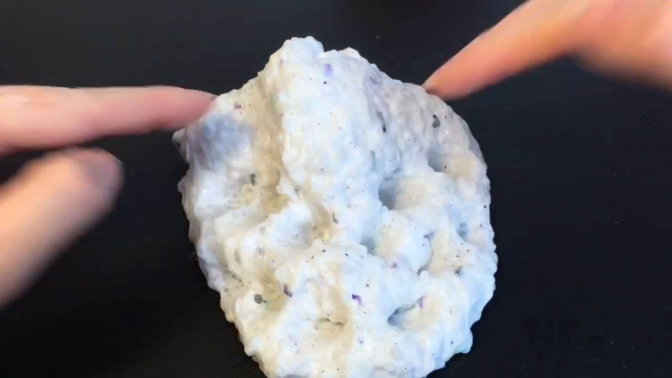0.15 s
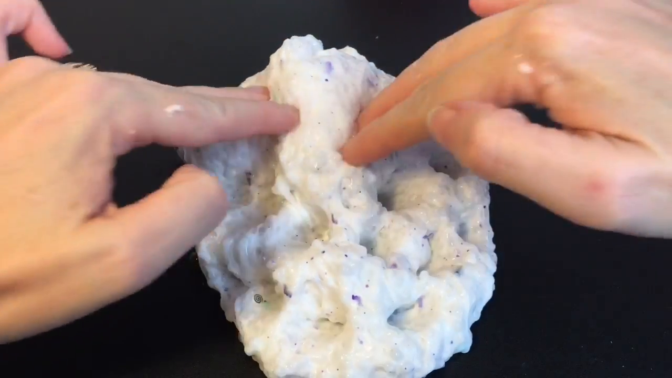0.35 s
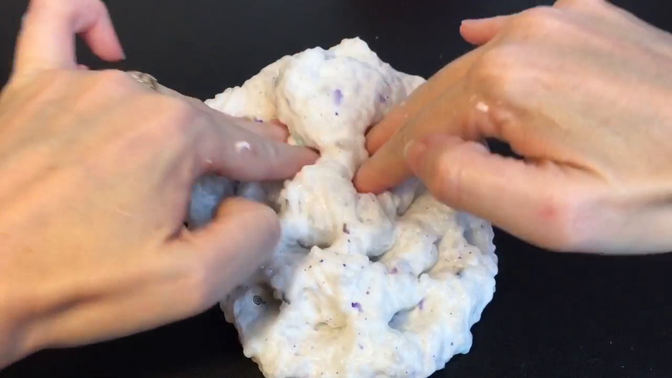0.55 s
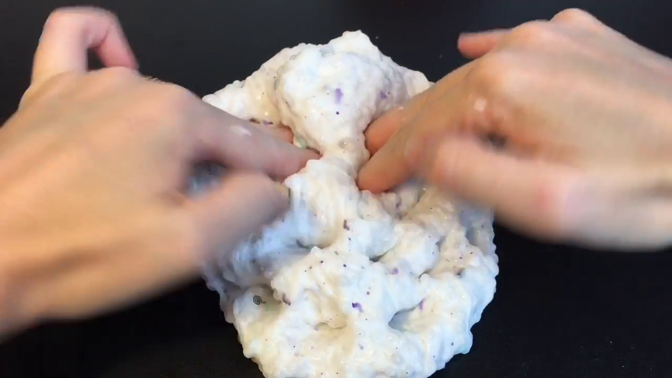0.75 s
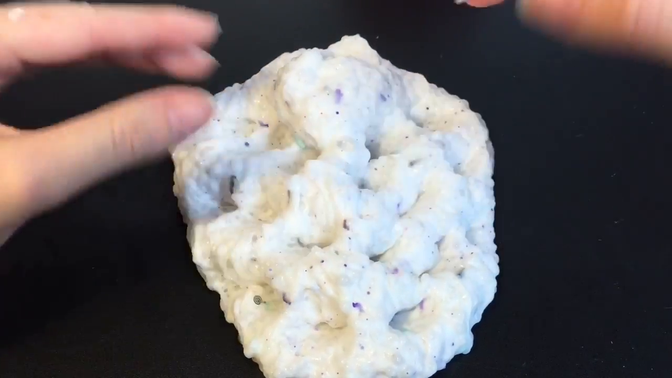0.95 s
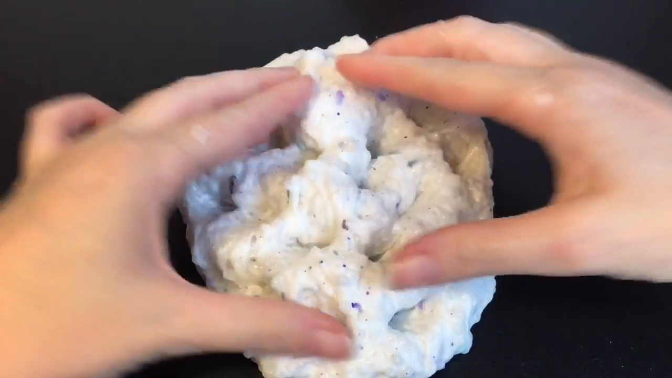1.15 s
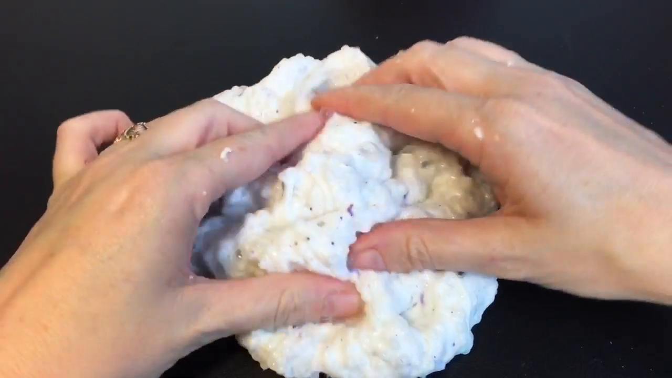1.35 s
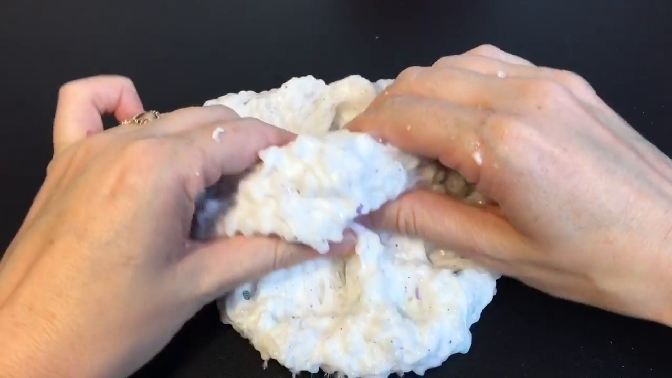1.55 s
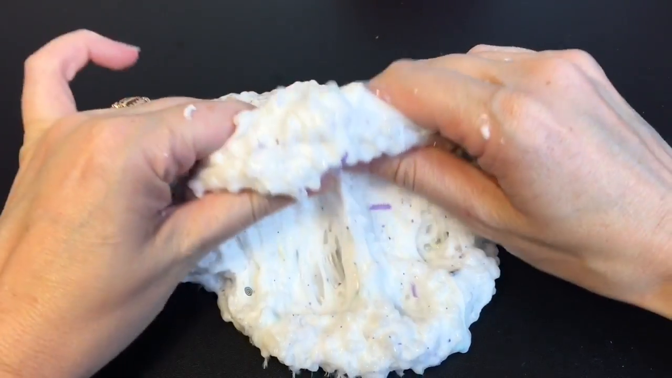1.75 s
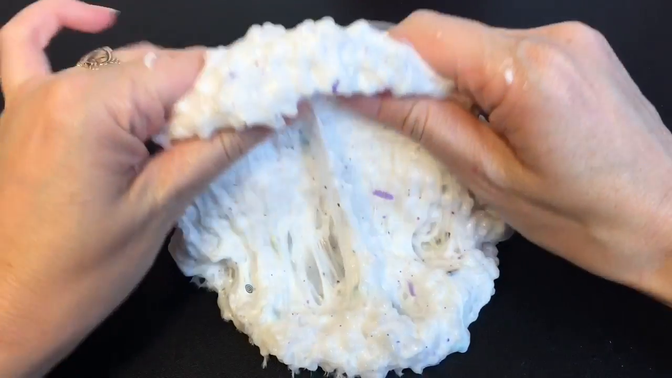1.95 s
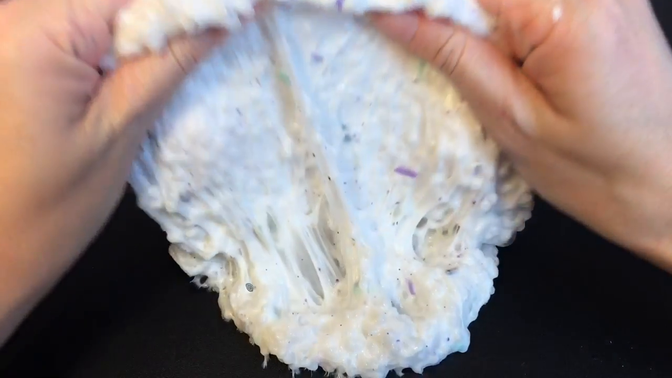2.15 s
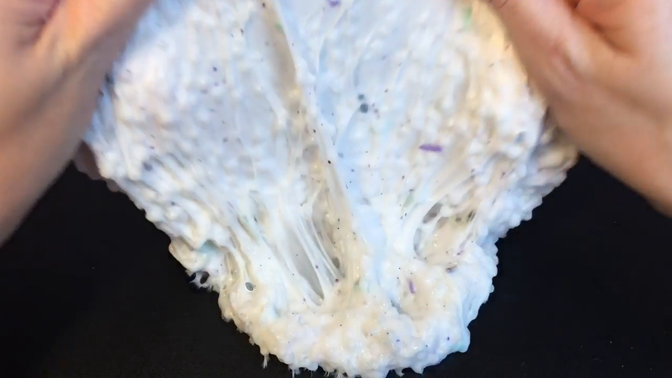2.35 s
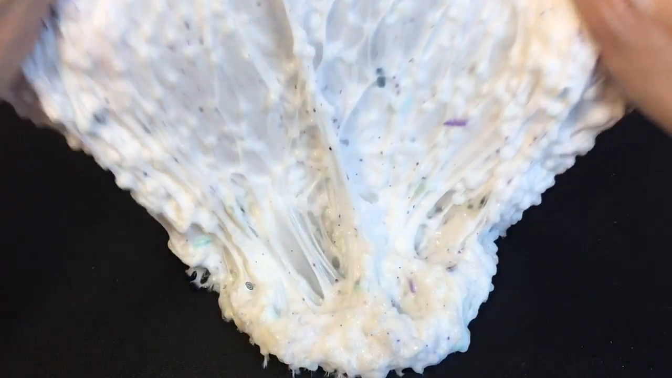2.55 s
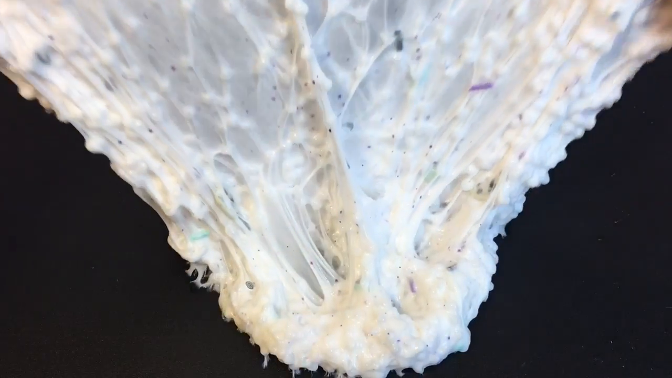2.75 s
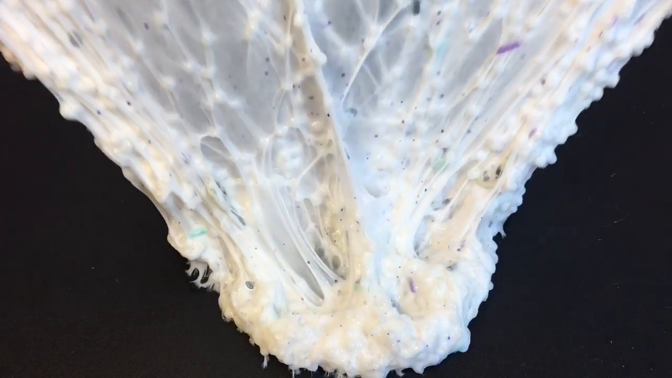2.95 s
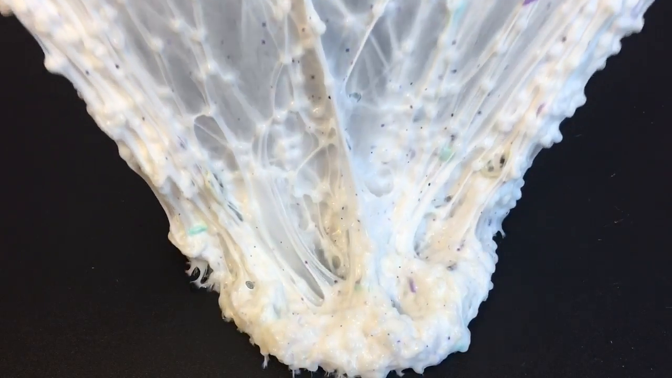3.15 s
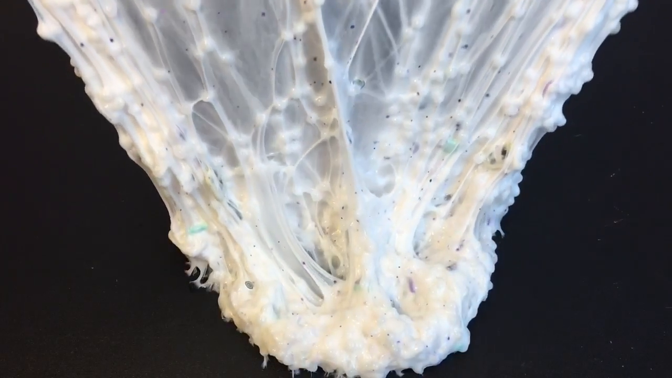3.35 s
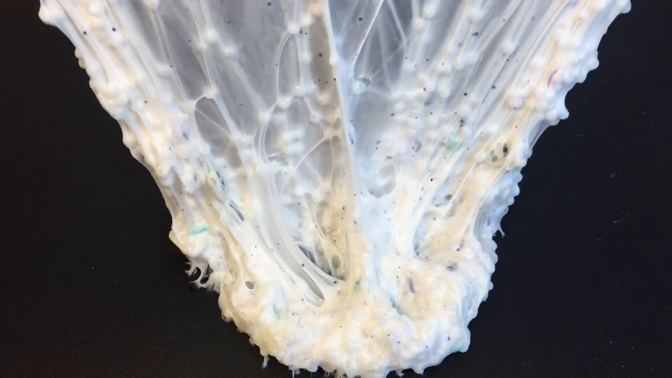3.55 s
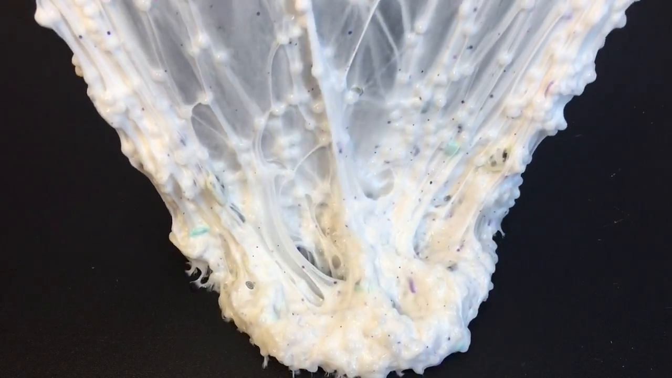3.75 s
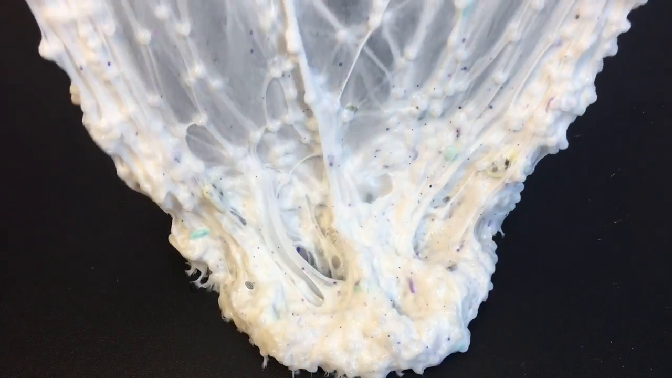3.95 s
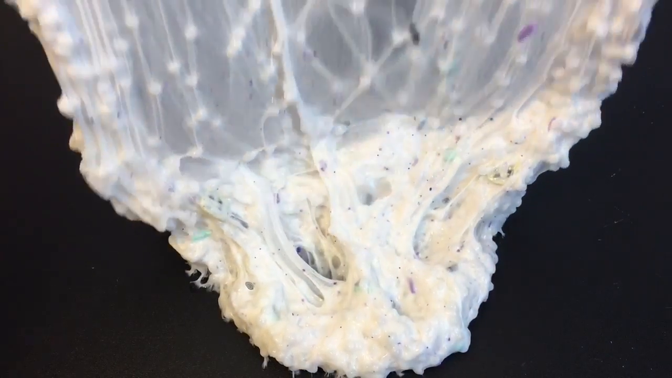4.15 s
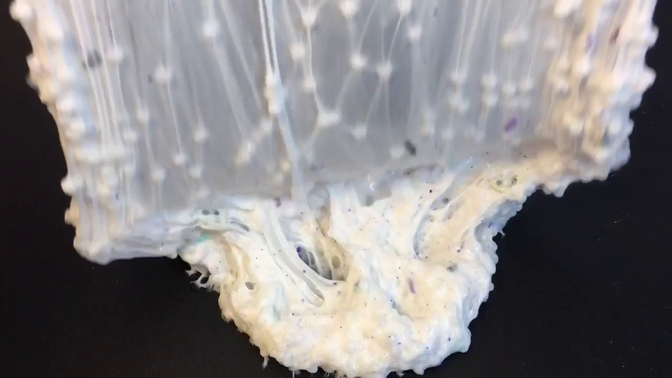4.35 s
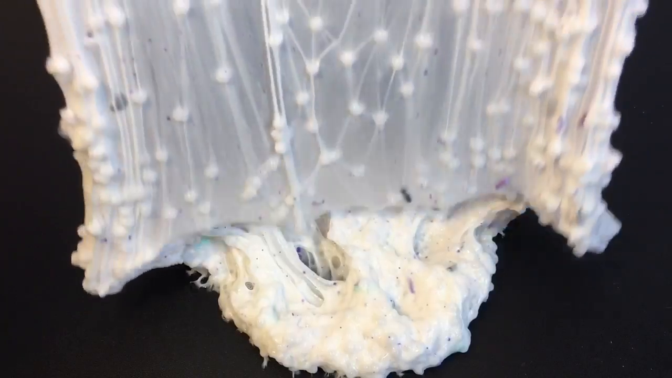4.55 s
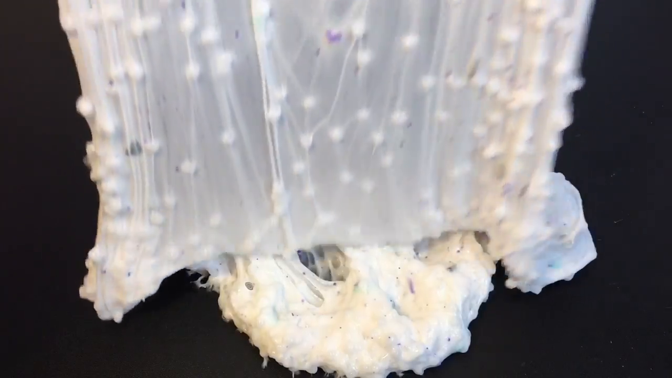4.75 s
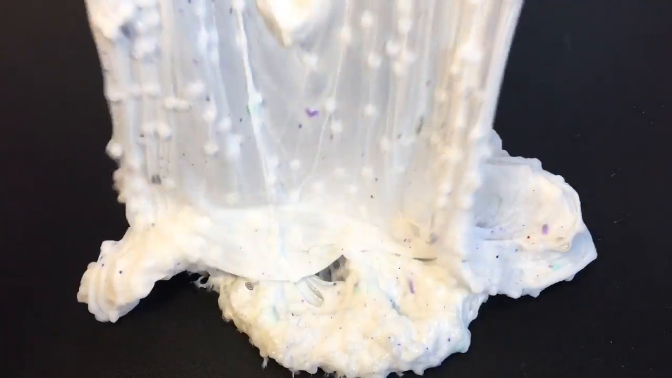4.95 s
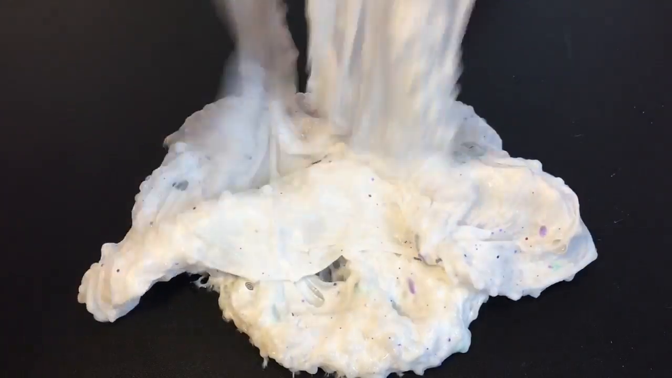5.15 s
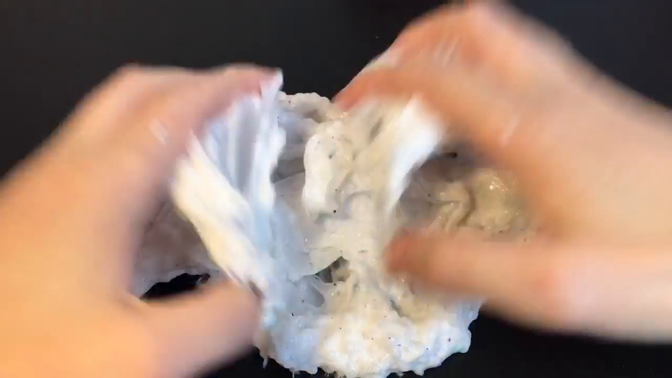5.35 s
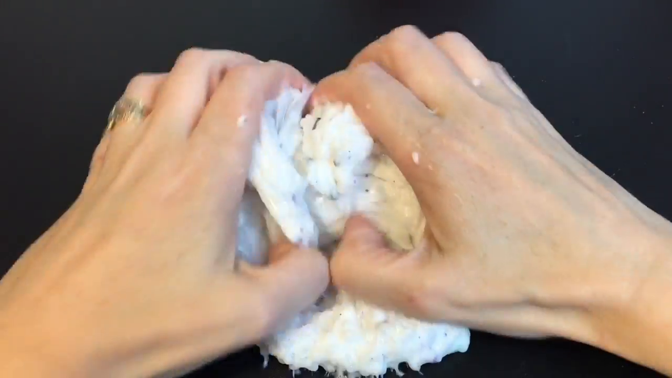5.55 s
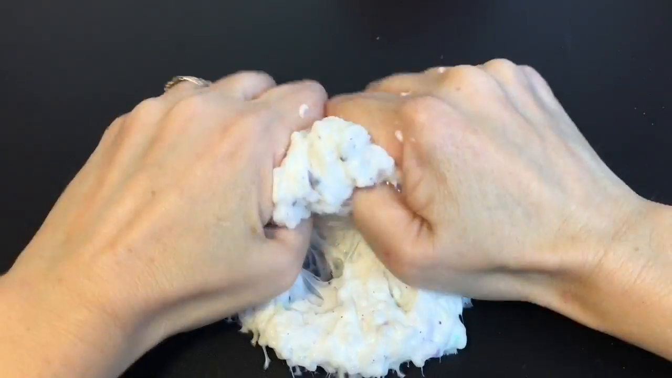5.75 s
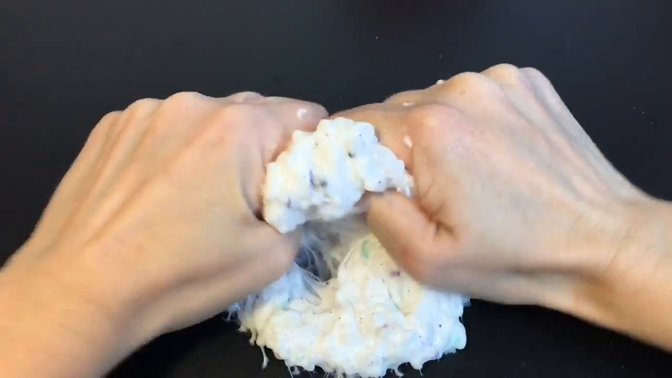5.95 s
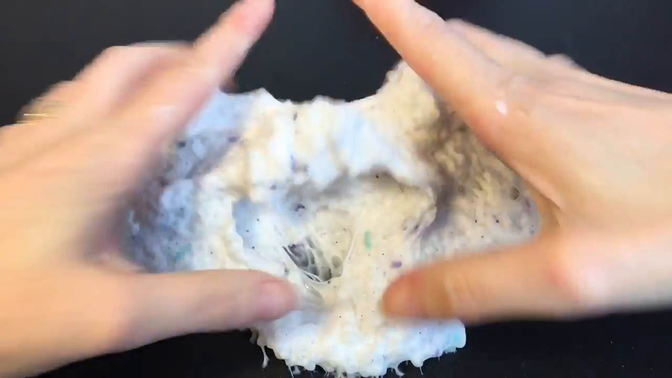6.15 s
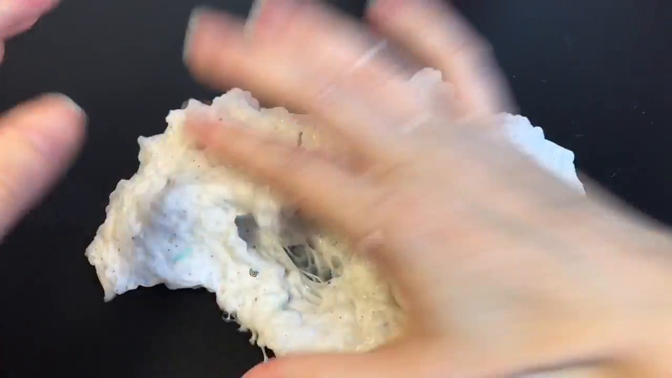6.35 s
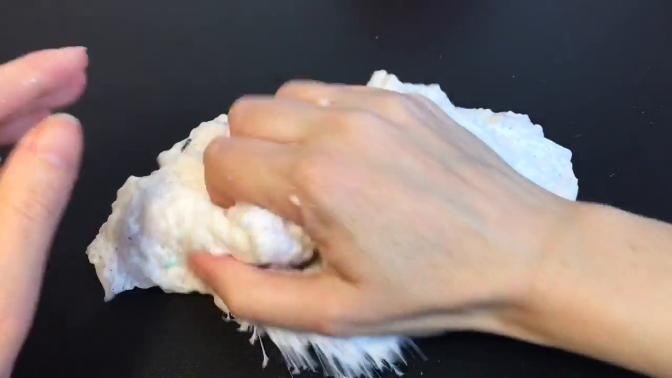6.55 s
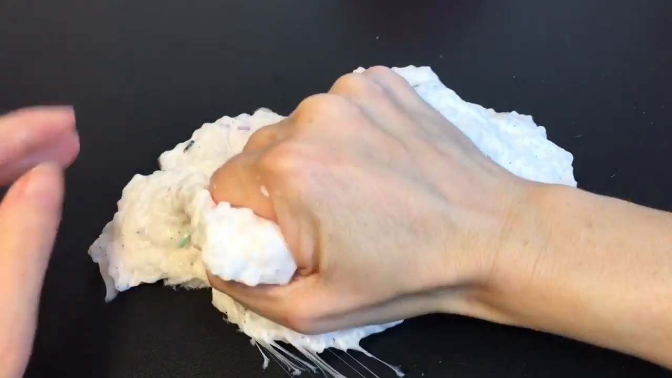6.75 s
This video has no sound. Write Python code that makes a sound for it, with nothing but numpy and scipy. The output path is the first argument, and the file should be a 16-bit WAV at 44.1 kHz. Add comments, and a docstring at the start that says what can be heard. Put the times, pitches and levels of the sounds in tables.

```python
"""Two hands knead a foam-bead slime on a table, close to the microphone in a small room.
First fingers poke it: trapped air pockets pop over a crackle of tiny bubbles, and the table thumps softly.
Then they grip, lift and stretch it; the thin sheet is almost silent until it folds back onto the table.
Squeezing it gives the loudest crunch; then it is pressed down, let go and squeezed once more by one hand.
Pops and crackle are short clicks ringing in damped air cavities; thumps are fading sine waves.
Shaped noise makes a dull rubbing and the air of the room, with a faint hum and a gliding drone behind."""
import sys
import numpy as np
from scipy import signal
from scipy.fft import rfft, irfft
from scipy.io import wavfile
from scipy.ndimage import uniform_filter1d

SR = 44100
rng = np.random.default_rng(int(sys.argv[2]) if len(sys.argv) > 2 else 0)


def bounce(signal):
    """Save signal as a 16-bit WAV file at the path given by the first command-line argument."""
    frames = np.transpose(np.atleast_2d(signal))
    limited = np.clip(frames, -1, 1)
    pcm = np.round(limited * 32767).astype(np.int16)
    wavfile.write(sys.argv[1], SR, pcm)


N = 303849


def from_db(db):
    """Turn decibels into a gain."""
    return 10 ** (np.asarray(db) / 20)


def rms_one(x):
    """Scale a sound to an average (rms) level of 1."""
    return x / np.sqrt(np.mean(x ** 2) + 1e-20)


def unit_energy(x):
    """Scale a pulse to an energy of 1."""
    return x / np.sqrt(np.sum(x ** 2) + 1e-20)


def at_hz(points, hz):
    """Read a spectrum in dB between its points, on a logarithmic pitch axis."""
    f, db = np.transpose(points)
    return np.interp(np.log(np.maximum(hz, 1)), np.log(f), db)


def coloured(x, spectrum):
    """Make some pitches of a noise stronger than others."""
    gain = from_db(at_hz(spectrum, np.fft.rfftfreq(len(x), 1 / SR)))
    return irfft(rfft(x) * gain, len(x))


def in_time(rows):
    """Join the rows of a curve by straight lines."""
    s, *columns = np.transpose(rows)
    return [np.interp(np.arange(N) / SR, s, column) for column in columns]


def drift(rate):
    """Wander at random with spread 1, heading for a new value `rate` times a second."""
    knots = rng.standard_normal(N // 20)
    return rms_one(np.interp(np.arange(N) / SR * rate, np.arange(len(knots)), knots))


def cavity(x, hz, q):
    """Ring like an air cavity: one resonance with gain 1 on top; a low q dies within a few cycles."""
    w = 2 * np.pi * min(hz, SR * 4 / 9) / SR
    damp = np.sin(w) / (2 * q)
    top, bottom = [damp, 0, -damp], [1 + damp, -2 * np.cos(w), 1 - damp]
    return signal.lfilter(top, bottom, x + 1e-18)


# Presses and pulls of the hands: poking, gripping and lifting, pulling up, the sheet thinning and tearing,
# folding onto the table, both hands squeezing, pressing down and letting go, one hand squeezing.
# Each row: start in seconds, end in seconds, fizz of the tiny bubbles at the start in dB, fizz at the
# end in dB, squelch of the larger bubbles in dB above the fizz.
STROKES = [(0.059, 0.115, -34.5, -32, -4), (0.392, 0.736, -61.5, -50.5, -1.5),
           (0.887, 0.959, -33, -38, -4.5), (1.296, 1.317, -37.5, -42, -6), (1.349, 1.433, -53.5, -44, 0.5),
           (1.468, 1.768, -40, -49, -4), (1.927, 1.968, -47, -45, -3.5), (1.77, 2.404, -51.5, -55, -5),
           (2.225, 2.257, -42, -47.5, -5.5), (2.452, 3.323, -59.5, -80, -6),
           (2.651, 2.714, -56.5, -59, 1.5), (4.956, 5.108, -61, -46.5, -17),
           (5.13, 5.203, -31.5, -38, -8.5), (5.241, 5.312, -33.5, -41.5, -11),
           (5.462, 5.8, -54.5, -29.5, -4.5), (5.773, 5.967, -25, -34, -7),
           (6.092, 6.199, -28.5, -31.5, -2.5), (6.21, 6.315, -40, -39.5, -3),
           (6.467, 6.568, -49.5, -46.5, -0.5), (6.594, 6.714, -29, -32.5, -8),
           (6.765, 6.757, -33.5, -26, 2)]
ATTACK_DB_PER_S, RELEASE_DB_PER_S = 748, 643   # the crackle comes and goes with the pressure
CREEP_DB, CREEP_DB_PER_S = -17.5, 149   # around each stroke the slime creeps, faintly and for longer
REST_FIZZ_DB, REST_SQUELCH_DB = -81, -85   # slime hanging under its own weight


def kneading(first_db, last_db, rest_db):
    """Crackle level in dB: strokes set in, swell or ease, and let go; the strongest one leads."""
    t, level_db = np.arange(N) / SR, np.full(N, float(rest_db))
    for (start, end, *_), held_db in zip(STROKES, zip(first_db, last_db)):
        before, after = np.maximum(start - t, 0), np.maximum(t - end, 0)
        pressure_db = -ATTACK_DB_PER_S * before - RELEASE_DB_PER_S * after
        creep_db = CREEP_DB - CREEP_DB_PER_S * (before + after)
        stroke_db = np.interp(t, [start, end], held_db) + np.maximum(pressure_db, creep_db)
        level_db = np.maximum(level_db, stroke_db)
    return level_db


# Large air pockets bursting.
# Each row: start in seconds, relative energy in dB, pitch of the cavity in Hz,
# share of the energy in the snap of the film (0 to 1).
POPS = [(0.0629, -3.5, 750, 0.47), (0.0775, -1, 4400, 0), (0.0939, -5, 505, 0.6), (0.119, -3.5, 3080, 0),
        (0.3769, -23, 3180, .26), (0.4668, -17, 6940, .13), (0.5572, -22, 2580, 0), (0.571, -20, 6110, 0.1),
        (0.6193, -11, 6770, 0.34), (0.6923, -11.5, 3200, 0.02), (0.7067, -14, 870, 0.23),
        (0.7234, -15, 4340, 0.1), (0.8865, -1.5, 12700, .36), (0.8931, 0.5, 4160, 0.13),
        (0.951, -11, 590, 0), (0.961, -5.5, 3320, 0), (1.283, -4, 5600, 0.1), (1.2958, -0.5, 4600, 0.06),
        (1.3766, -8, 6200, 0), (1.3868, -8.5, 980, 0.43), (1.4204, -3.5, 7100, 0),
        (1.483, -2.5, 7300, 0.05), (1.5822, 4.5, 3800, 0.1), (1.6997, -5.5, 3300, 0),
        (1.736, -17, 3780, .06), (1.7613, -12, 3580, 0), (1.8005, -7.5, 2700, 0), (1.8099, -11, 2970, .98),
        (1.8814, -18.5, 6780, 0.3), (1.9229, -11.5, 1040, 0.98), (1.958, -15.5, 4500, .4),
        (2.2492, -9, 4860, 0.3), (2.3282, -4.5, 7240, 0.08), (2.4083, -25, 1900, 0),
        (2.5004, -15, 12600, 0.27), (2.5665, -26.5, 690, 0.65), (2.623, -23.5, 8570, 0.1),
        (2.648, -24, 2200, 0), (2.667, -22.5, 2700, 0), (2.7113, -19, 6300, 0), (3.135, -30.5, 3200, 0.2),
        (3.24, -25, 3650, .02), (3.2922, -21, 6860, 0), (4.1008, -35.5, 3850, 0), (4.4114, -35, 2260, 0.21),
        (4.477, -34.5, 1980, .3), (4.8463, -30, 8400, .03), (4.921, -8.5, 12800, 0.28),
        (4.9778, -5, 2060, 0.16), (5.0933, -7.5, 9900, .5), (5.1286, 0, 4700, 0.3),
        (5.1293, -5.5, 720, 0.1), (5.132, -7, 2200, 0.04), (5.1691, -3.5, 1520, .3), (5.215, -2, 9700, .45),
        (5.2429, -1.5, 6730, 0), (5.3222, -11.5, 11600, 0.26), (5.4499, -18, 9500, 0),
        (5.487, -2.5, 9100, 0.45), (5.533, -10, 7150, 0.26), (5.5782, -9.5, 3360, 0.05),
        (5.6598, -9, 3400, 0), (5.6681, -2.5, 1390, 0.2), (5.724, 1, 3780, 0.04), (5.751, 1.5, 1820, 0),
        (5.775, -4, 7350, 0), (5.7935, 7, 870, 0.16), (5.811, 18.5, 1510, 0.67), (5.8146, 11.5, 1750, 0.91),
        (5.845, 15.5, 1080, 0.68), (5.8651, 10.5, 2190, 0.54), (5.873, 13.5, 7240, 0.18),
        (5.8762, 14, 4030, 0.68), (5.9047, -1, 1070, 0), (5.9179, 1, 8900, 0.3), (5.9198, 10, 9700, 0.1),
        (5.932, 10.5, 6100, 0.08), (5.9366, -4, 7300, 0.1), (5.9474, 9.5, 7800, 0.27),
        (5.9942, -3.5, 12300, 0.4), (6.0036, -1, 1900, 0.76), (6.0712, -6, 870, 0.97),
        (6.0961, 1.5, 2970, .07), (6.105, 4.5, 3130, 0), (6.277, -8.5, 7070, 0.66), (6.4647, -12, 8990, 0),
        (6.4823, 0, 4240, 0), (6.5172, -6, 1610, 0.5), (6.5416, 0.5, 1700, 0.03), (6.555, 1, 1590, 1),
        (6.612, 5, 6160, 0), (6.6456, 4, 1240, 0.3), (6.6669, 6, 4700, 0), (6.6767, 10, 5940, 0.1),
        (6.6917, 12.5, 5270, 0.01), (6.7452, 5, 9200, 0.15), (6.759, 3, 870, 0.3), (6.8125, -2, 5600, 0.25),
        (6.8774, -12.5, 3200, 0.16)]


def pops(rows, q, snap_hz, snap_q, skirt_q, gain_db):
    """The film snaps and the opened pocket rings for a few cycles; the slime damps it quickly."""
    out, click = np.zeros(N), signal.unit_impulse(SR // 50)
    snap = unit_energy(cavity(cavity(click, snap_hz, snap_q), snap_hz, snap_q))
    for s, db, hz, share in rows:
        share = np.clip(share, 0, 1)
        ring = unit_energy(cavity(cavity(click, hz, q), hz, skirt_q))
        pop = unit_energy(np.sqrt(1 - share) * ring - np.sqrt(share) * snap)
        pop = signal.fftconvolve(pop, scatter(bounce_s=0.00026, near_db=-6.0, near_t60=0.039))
        at = int(s * SR)
        out[at:at + len(pop)] += from_db(db + gain_db) * pop[:N - at]
    return out


SMALL_POPS_PER_S = 30
SMALL_POP_DB, SMALL_POP_SPREAD_DB = -28, 6.5   # middle of the relative energy; scatter up and down
SMALL_POP_FOLLOWS = 0.85   # share of the fizz's swing in dB that their energy follows
SMALL_POP_LOW_HZ, SMALL_POP_HIGH_HZ, SMALL_POP_SNAP = 2200, 10260, 0.33


def small_pops(fizz_db):
    """Small pockets burst at random moments and pitches, stronger the harder the slime is worked."""
    when, size, pitch = rng.random((int(SMALL_POPS_PER_S * N / SR), 3)).T
    effort_db = fizz_db[(when * N).astype(int)] - fizz_db.mean()
    db = SMALL_POP_DB + SMALL_POP_FOLLOWS * effort_db + SMALL_POP_SPREAD_DB * (2 * size - 1)
    hz = SMALL_POP_LOW_HZ * (SMALL_POP_HIGH_HZ / SMALL_POP_LOW_HZ) ** pitch
    # same columns as the large pockets
    return [(*row, SMALL_POP_SNAP) for row in zip(when * N / SR, db, hz)]


def crackle(level_db, colour, per_s, growth, size_db, clump_db, q, spread_db, patchy_db, count):
    """Bubbles burst in clumps at `count` pitches; harder kneading bursts more of them."""
    rate = per_s * from_db(growth * (level_db + 40))   # per_s holds at -40 dB, before clumping
    born = rng.random(N) < rate * from_db(clump_db * drift(130)) / SR
    sizes = from_db(size_db * np.minimum(rng.exponential(1, N), 4)) * rng.choice([-1, 1], N)
    clicks = born * sizes
    # the work of the hands is shared among the bubbles of each moment
    power = uniform_filter1d(uniform_filter1d(clicks ** 2, size=700), size=700)
    clicks = clicks * from_db(level_db) / np.sqrt(np.abs(power) + rate / SR / 2)
    pitches = np.geomspace(colour[0][0], colour[-1][0], count)
    gains = rms_one(from_db(at_hz(colour, pitches)))
    dealt = rng.integers(0, count, N)   # which pitch each bubble gets
    out = np.zeros(N)
    for k, hz in enumerate(pitches):
        paths = scatter(bounce_s=.0002, near_db=spread_db, near_t60=0.041)
        ring = unit_energy(cavity(cavity(paths, hz, q), hz, 0.29))
        # folds open and close, favouring one pitch after another
        favour = rms_one(from_db(patchy_db * drift(45)))
        out += gains[k] * favour * signal.oaconvolve(clicks * (dealt == k), ring)[:N]
    return out


# Colour of the tiny bubbles. Each row: pitch in Hz, relative strength of that resonance in dB.
FIZZ = [(2800, 3), (3600, 5), (5000, 4), (6800, 7), (9000, 9), (10500, 2.5), (12500, 5), (15500, 3)]


def fizz(fizz_db):
    """Tiny bubbles and unsticking beads crackle at high pitches."""
    return crackle(fizz_db, FIZZ, per_s=3200, growth=.55, size_db=4.0, clump_db=5.5,
                   q=2.4, spread_db=-1, patchy_db=3.0, count=20)


# Colour of the larger bubbles. Each row: pitch in Hz, relative strength of that resonance in dB.
SQUELCH = [(400, -9.5), (650, -17.5), (1000, 2), (1500, -23), (2200, -2.5)]


def squelch(squelch_db):
    """Larger bubbles ring lower and sound wetter."""
    return crackle(squelch_db, SQUELCH, per_s=2300, growth=.35, size_db=3.5, clump_db=4.0,
                   q=3.6, spread_db=-0.5, patchy_db=4.0, count=22)


# Soft blows on the table through the slime.
# Each row: start in seconds, relative level in dB, pitch in Hz, time to fade by 60 dB in seconds.
THUMPS = [(0.07, -20, 109, 0.072), (0.084, -21.5, 125, 0.16), (0.129, -19, 113, 0.071),
          (0.822, -44, 210, 0.087), (0.904, -27.5, 129, 0.2), (0.934, -22.5, 138, 0.065),
          (0.952, -22, 107, 0.11), (1.486, -42, 106, 0.14), (1.664, -27.5, 171, 0.018),
          (1.94, -40, 136, 0.074), (3.236, -42, 63.8, 0.89), (5.877, -31, 127, 0.073),
          (6.103, -27.5, 102, 0.12), (6.184, -25.5, 128, 0.061), (6.477, -21.5, 97, 0.065),
          (6.758, -27, 141.3, 0.036)]


def thumps(rise_s, gain_db, overtone, overtone_db, overtone_t60):
    """A cushioned finger pushes the table top, which swings and fades, with one higher mode."""
    out, t = np.zeros(N), np.arange(SR // 2) / SR
    for s, db, hz, t60 in THUMPS:
        low = np.sin(2 * np.pi * hz * t) * from_db(-60 * t / t60)
        high = np.sin(2 * np.pi * hz * overtone * t) * from_db(-60 * t / overtone_t60)
        swing = (low + from_db(overtone_db) * high) * (1 - np.exp(-t / rise_s))
        at = int(s * SR)
        out[at:at + len(t)] += from_db(db + gain_db) * swing[:N - at]
    return out


# Colour of the dull kneading noise in the table. Each row: pitch in Hz, relative strength per Hz in dB.
TABLE = [(30, -5.5), (70, 4.5), (130, 0.5), (250, 1), (400, -8.5), (700, -29), (2000, -57)]


def rubbing(squelch_db):
    """Kneading passes into the table as a dull noise, 7 dB below the squelch level."""
    return from_db(squelch_db - 7.0) * rms_one(coloured(rng.standard_normal(N), TABLE))


# Colour of the reflections, near and far. Each row: pitch in Hz, relative strength in dB.
ROOM_COLOUR = [(100, -27), (500, 4), (2000, 12), (6000, 9.5), (15000, 7.5)]


def scatter(bounce_s, near_db, near_t60):
    """The direct sound and the short paths between table and moving hands, drawn anew each time."""
    t = np.arange(SR // 20) / SR
    near = coloured(rng.standard_normal(len(t)), ROOM_COLOUR)
    near = near * from_db(-60 * t / near_t60) * (t > bounce_s)
    return signal.unit_impulse(len(t)) + from_db(near_db) * unit_energy(near)


def surroundings(x, room_db, room_t60):
    """Add the faint tail of a small furnished room: fading noise that starts after 4 ms."""
    t = np.arange(SR // 2) / SR
    tail = coloured(rng.standard_normal(len(t)), ROOM_COLOUR)
    tail = tail * from_db(-60 * t / room_t60) * (t > .004)
    return x + from_db(room_db) * signal.oaconvolve(x, unit_energy(tail))[:N]


# Colour of the room's air. Each row: pitch in Hz, relative strength per Hz in dB.
AIR = [(20, -30), (32, -9), (45, 4), (65, 2), (100, -8), (170, -9.5), (235, -5), (280, -17), (350, -14.5),
       (450, -24.5), (800, -27.5), (2000, -32.5), (6000, -35), (10500, -39.5), (16000, -38.5)]
AIR_DB = -54


def room_air():
    """The air of the room murmurs: steady noise, strongest in the bass."""
    return from_db(AIR_DB) * rms_one(coloured(rng.standard_normal(N), AIR))


# Faint hum. Its one row: pitch in Hz, approximate width in Hz, level in dB.
HUM = (245, 3.2, -65)


def hum():
    """Noise through two narrow resonances leaves one wavering pitch."""
    hz, width_hz, db = HUM
    q = hz / width_hz / 2
    return from_db(db) * rms_one(cavity(cavity(rng.standard_normal(N), hz, q), hz, q))


# Faint gliding drone, like a far engine. Each row: time in seconds, pitch in Hz, level in dB.
DRONE = [(0, 275, -91), (2.75, 289.6, -72.5), (2.92, 287, -61.5), (3.12, 288, -60), (3.25, 296, -77),
         (3.85, 323.7, -73), (4.12, 332.4, -67), (4.4, 344, -74), (4.85, 344.4, -71), (5.1, 359, -105)]


def drone():
    """One sine wave whose pitch and level glide from row to row."""
    hz, db = in_time(DRONE)
    return from_db(db) * rms_one(np.sin(2 * np.pi * np.cumsum(hz) / SR))


def scene():
    """Pops and crackle above the table, thumps through it, and the quiet room around."""
    _, _, first_db, last_db, wet_db = np.transpose(STROKES)
    fizz_db = kneading(first_db, last_db, REST_FIZZ_DB)
    squelch_db = kneading(first_db + wet_db, last_db + wet_db, REST_SQUELCH_DB)
    bursts = pops(POPS + small_pops(fizz_db), q=1.9, snap_hz=9200, snap_q=0.3, skirt_q=.2, gain_db=-1.98)
    bubbles = fizz(fizz_db) + squelch(squelch_db)
    slime = surroundings(bursts + bubbles, room_db=-16.5, room_t60=0.18)
    blows = thumps(rise_s=0.002, gain_db=2.0, overtone=2.99, overtone_db=-2.5, overtone_t60=0.022)
    background = room_air() + hum() + drone()
    return (slime + blows + rubbing(squelch_db) + background)[None]


CUTOFF_HZ = 16200


def record(dry):
    """Peaks beyond full scale are clipped flat, then everything above the cutoff is removed."""
    clipped = np.clip(dry, -1, 1)
    low_pass = signal.ellip(10, .1, 80, CUTOFF_HZ, fs=SR, output="sos")
    return signal.sosfilt(low_pass, clipped)


dry = scene()
out = record(dry)
bounce(out)
```